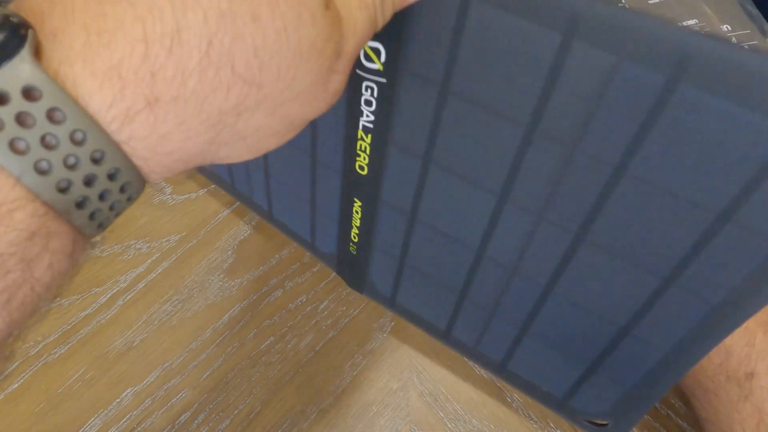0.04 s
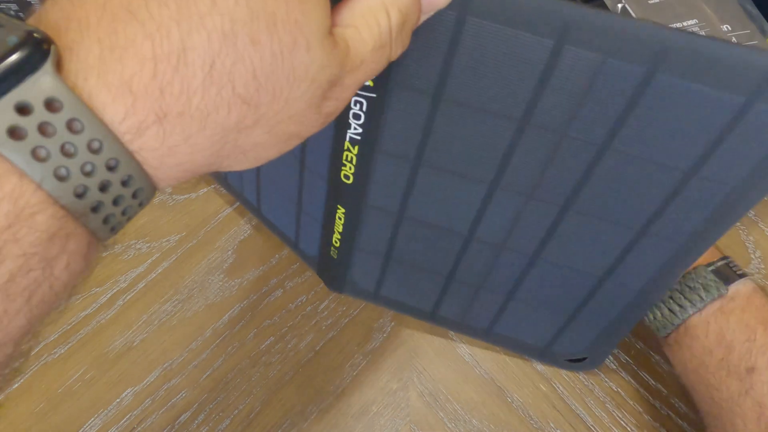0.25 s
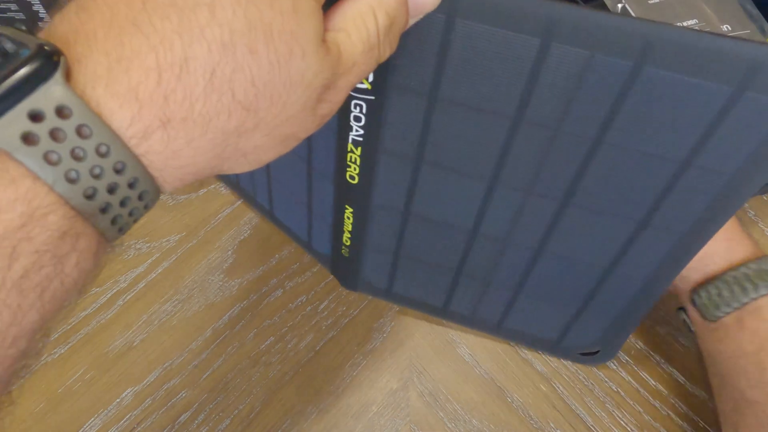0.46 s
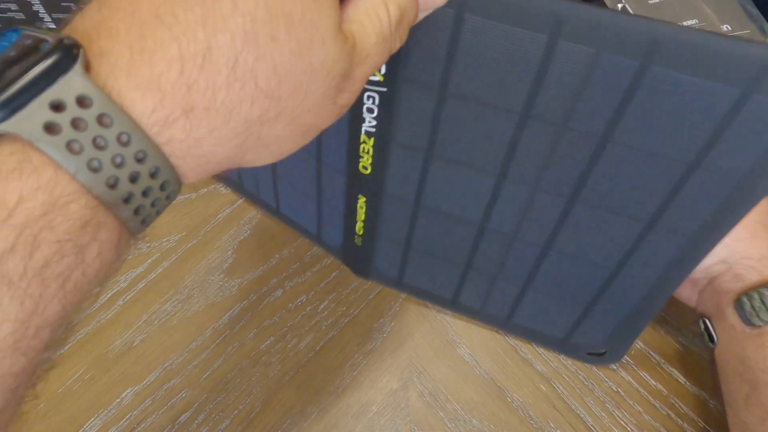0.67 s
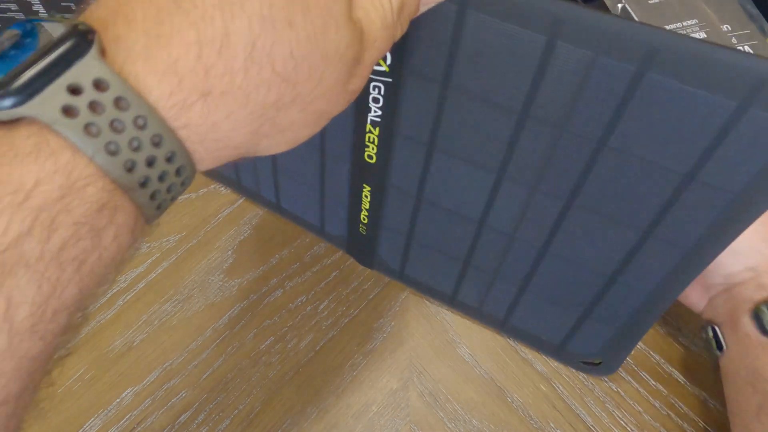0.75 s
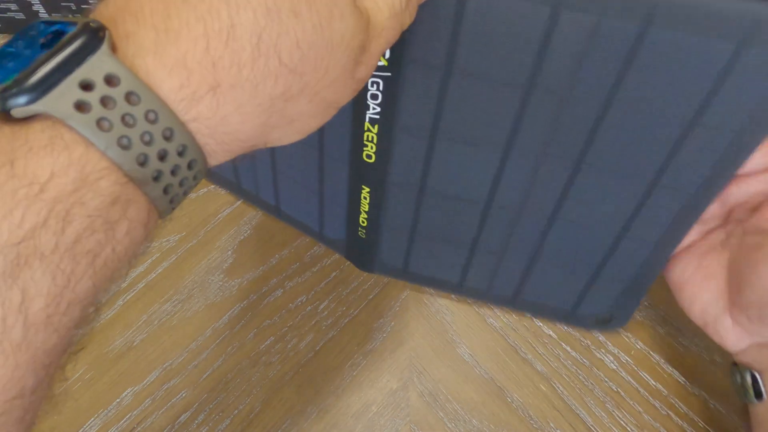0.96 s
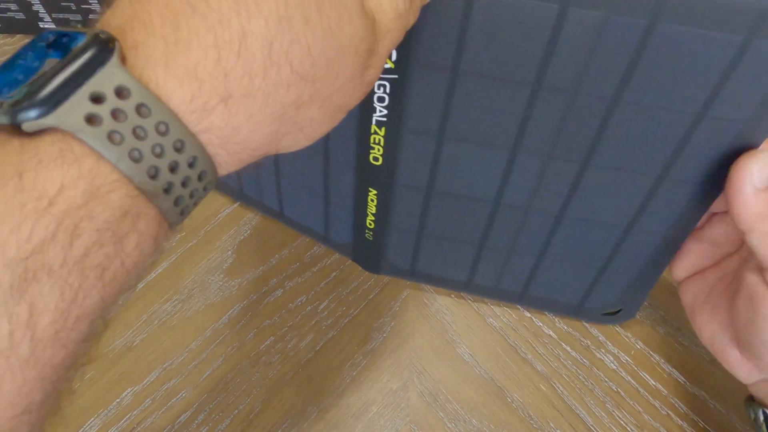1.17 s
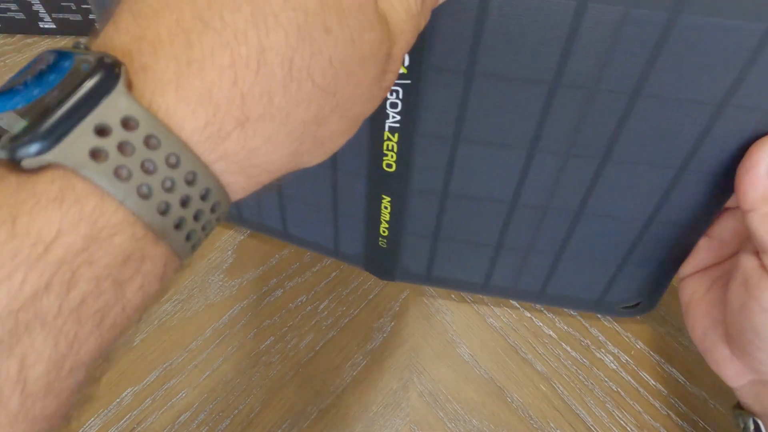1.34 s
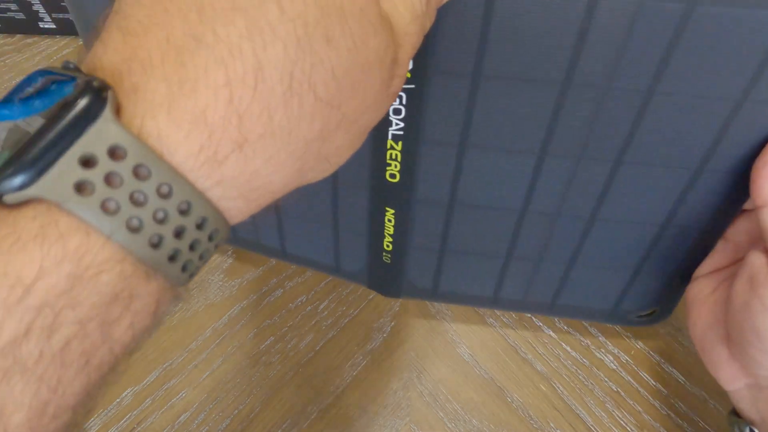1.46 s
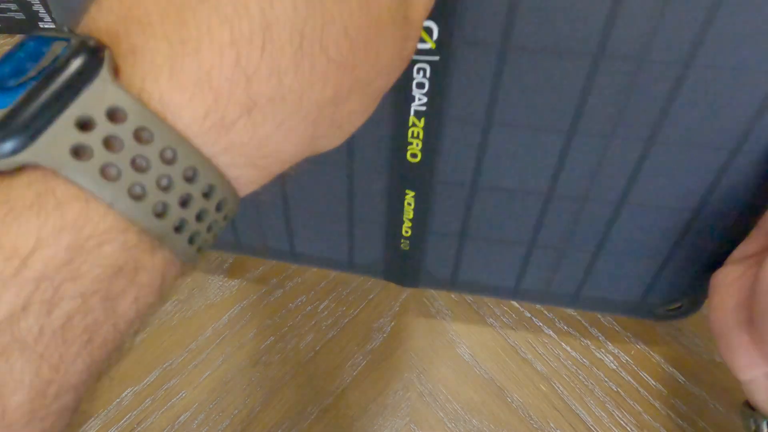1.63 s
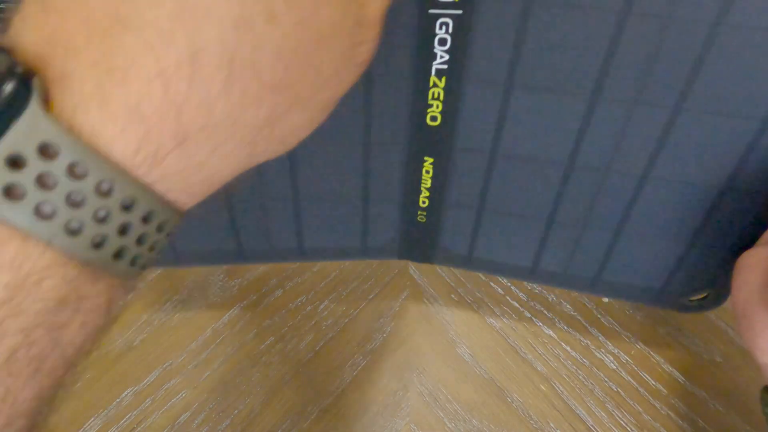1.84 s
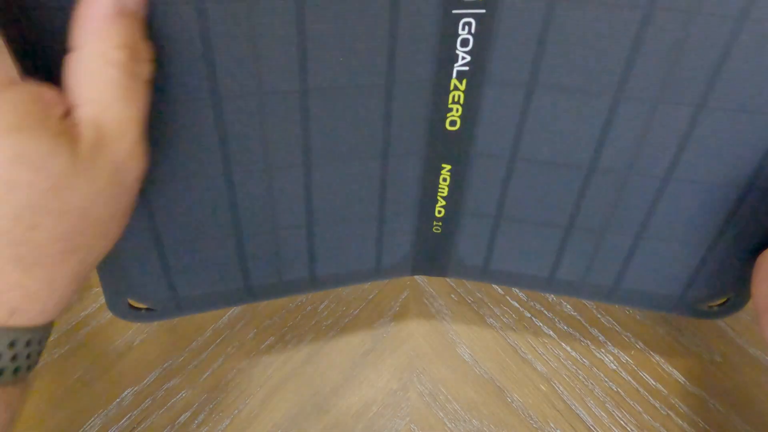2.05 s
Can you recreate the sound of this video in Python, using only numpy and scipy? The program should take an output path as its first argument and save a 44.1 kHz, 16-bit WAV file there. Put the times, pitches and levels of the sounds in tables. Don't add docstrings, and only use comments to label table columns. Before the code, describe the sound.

Wire kickstand clicking and creaking as it swings, with dull panel bumps on a wooden tabletop

```python
import sys
import numpy as np
from scipy import signal
from scipy.io import wavfile

SR = 44100
rng = np.random.default_rng(int(sys.argv[2]) if len(sys.argv) > 2 else 0)


def unload_audio(sound):
    columns = np.transpose(np.atleast_2d(sound))
    steps = np.round(np.clip(columns, -1, 1) * 32767)
    wavfile.write(sys.argv[1], SR, steps.astype(np.int16))


def gain_from_decibels(decibels):
    exponent = np.asarray(decibels, float) / 20
    return 10 ** exponent


N = 92610

# start_s, level_db
HUM_LEVEL = [(0, -60), (.2, -51), (1.7, -58.5), (1.85, -78.5), (1.98, -52.5), (2.1, -50.5)]
# frequency_hz, density_db (per Hz)
AIR_SPECTRUM = [(20, 10.5), (60, -14), (130, -3), (250, -14), (600, -54.5), (2500, -56.5), (6000, -41.5),
                (14000, -74)]
# frequency_hz, share
LIKENESS = [(60, 0.75), (300, 0.49), (1000, 0.8), (4000, 0.69), (12000, 0.64)]
# start_s, level_db, brightness_db_per_octave
RUB = [(0, -81, 2.5), (.6, -71, -8), (.75, -60, 11), (.8, -44.5, 0), (.87, -57.5, -3), (.96, -58.5, -4),
       (1.03, -45, -1.5), (1.08, -43, -4.5), (1.11, -60.5, -1), (1.3, -54.5, 0.5), (1.55, -56, -1.5),
       (1.67, -65, 2.5), (1.72, -57, 2.5), (1.77, -79, 10.5), (1.87, -70.5, 0.5), (1.93, -74.5, 10.5),
       (1.99, -46, 7), (2.1, -53, 6)]
# frequency_hz, density_db (per Hz)
CLOTH_SPECTRUM = [(250, 10.5), (500, 2), (1000, 9), (2000, 1), (3000, -9.5), (4700, -9), (8000, -24.5),
                  (14000, -43)]
# start_s, level_db
DRAG = [(0, -80), (.19, -68), (.22, -36), (.5, -41), (.56, -37.5), (.67, -56), (.8, -30), (.94, -43.5),
        (1.0, -27.5), (1.09, -43), (1.12, -49.5), (1.3, -37.5), (1.55, -47.5), (1.6, -56.5), (1.8, -63),
        (2.1, -68.5)]
# start_s, peak_db, contact_softness_ms, flex_pitch_hz
BUMPS = [(0.207, -32.5, 0.21, 170), (0.294, -25.5, 1.8, 169), (0.348, -35, 0.63, 108),
         (0.458, -34.5, 0.63, 154), (0.58, -21.5, 0.44, 83.6), (0.614, -16.5, 1.12, 125.6),
         (0.784, -25, 0.92, 139.4), (0.809, -14.5, 2.67, 75), (0.843, -22, 2.1, 98),
         (0.966, -18.5, 1.66, 147), (.977, -20.5, 0.73, 128), (1.034, -30, 0.24, 104),
         (1.062, -28, 0.064, 117), (1.088, -29, 0.21, 70.5), (1.136, -23, 1.2, 74.6),
         (1.208, -17, 0.24, 130), (1.237, -27, 0.84, 110), (1.268, -16.5, 1.28, 163),
         (1.301, -64, 0.71, 115), (1.467, -43, 0.15, 179), (1.718, -54, 0.35, 144)]
# pitch_hz, level_db, t60_s
TABLE_MODES = [(59.3, -5.5, 0.31), (108, -10, 0.27), (133.7, 3.5, 0.053), (169.7, -5, 0.28),
               (248.6, -1.5, 0.17), (265, -2, 0.05), (337, -2.5, 0.069), (396.5, -12, 0.14),
               (503, 2, 0.015)]
# start_s, peak_db, contact_softness_ms, chatter_s, low_ring_db
SNAPS = [(0.1853, -61, 0.039, 0.012, -8), (0.197, -44, 0.051, 0.007, -7.5),
         (0.2077, -19.5, 0.033, 0.0097, -5), (0.218, -29.5, 0.083, 0.0056, 3),
         (0.299, -26.5, 0.053, 0.0027, 0), (0.424, -17.5, 0.072, 0.0015, -8.5),
         (0.429, -31, 0.28, 0.0015, 7.5), (0.7763, -25, 0.051, 0.0027, -1.5),
         (0.9066, -37, 0.12, 0.00081, -4.5), (1.211, -32, 0.21, 0.0026, -9),
         (0.782, -29.5, 0.089, 0.0042, -5)]
# pitch_hz, width_hz, level_db
FRAME_MODES = [(1099, 74, -4.5), (1424, 110, -10), (1600, 41, -6.5), (1666, 39, -12.5), (2088, 82, -6.5),
               (2547, 58, -14.5), (2663, 40, -13.5), (2854, 110, -12), (3420, 370, -2.5), (3790, 43, -16.5),
               (4660, 27, -17.5), (4700, 180, -29), (5070, 390, -0.5), (7330, 1200, 4.5)]
# pitch_hz, width_hz, level_db
FOLDED_FRAME_MODES = [(1040, 78, -6), (1357, 41, -9.5), (1505, 130, -7), (2000, 37, -13), (2450, 120, -7),
                      (2750, 210, -4), (3530, 90, -7.5), (4231, 150, -7.5), (6040, 270, -1.5),
                      (6560, 490, -1.5)]
# start_s, level_db, brightness_db_per_octave
SCRAPE = [(.2, -109, -16), (.24, -43, 10), (.33, -42, -0.5), (.4, -50, -1), (.5, -50, 3), (.57, -49, 2),
          (.62, -72, 6.5), (.68, -62.5, 6), (.765, -40.5, 2.5), (.84, -48.5, -2.5), (1.1, -54, -5.5),
          (1.25, -52, 2.5), (1.28, -67.5, 12), (1.345, -40.5, 0.5), (1.39, -40, 1), (1.545, -43.5, -0.5),
          (1.575, -54, -2.5), (1.76, -73.5, -2.5)]
# pitch_hz, width_hz, level_db
WIRE_MODES = [(582, 52, -3.5), (929, 19, -19.5), (1074, 59.5, -7), (1508, 152, 2), (1646, 246, 3),
              (2183, 180, -6.5), (2400, 41, -13.5), (2650, 230, -12), (2802, 53, -15.5), (3093, 162, -12.5),
              (3744, 250, -10), (4685, 104, -18.5), (4945, 370, -15), (6540, 180, -30)]
# start_s, length_s, from_hz, to_hz, level_db
SQUEAKS = [(.212, 0.021, 1600, 1634, -35.5), (.325, 0.019, 1035, 1040, -43),
           (.345, 0.042, 1040, 1005, -44.5), (.355, 0.048, 1600, 1600, -56.5),
           (.52, 0.063, 1076, 1113, -52), (.67, 0.13, 1629, 1600, -58.5), (.738, 0.039, 1627, 1615, -47),
           (.73, 0.02, 1060, 1127, -60), (1.1, .05, 1600, 1600, -53), (.21, .022, 1104, 1134, -37),
           (1.25, 0.058, 1570, 1594, -51), (1.26, 0.077, 1076, 1068, -53.5),
           (1.305, 0.077, 1579, 1578, -46.5), (1.36, 0.042, 1080, 1123, -47.5),
           (1.465, 0.062, 1638, 1632, -49), (1.505, 0.055, 1680, 1656, -45.5),
           (1.56, 0.069, 1656, 1657, -60)]
# start_s, peak_db, brightness_db_per_octave, length_s, lower_ring_lean_db
CATCHES = [(0.902, -39.5, -1.5, 0.0023, -5), (1.262, -44.5, -3, 0.017, 9), (1.317, -33, -10, 0.015, -4.5),
           (1.3612, -34, 2.5, 0.0047, 8), (1.373, -33, 6, 0.0098, 12), (1.396, -25.5, -9, 0.0062, -2),
           (1.402, -34, 4.5, 0.005, 9), (1.4455, -37, 1, 0.0055, 13.5), (1.468, -36, -7, 0.0081, 3),
           (1.49, -33.5, 5.5, 0.0057, 5), (1.514, -34, 2, 0.0053, -6), (1.5247, -34.5, -2, 0.0091, -0.5),
           (1.552, -46, -10, 0.002, -18), (1.672, -46, -13, 0.0021, 0.5)]
# start_s, length_s, from_hz, to_hz, level_db
FOLD = [
    (1.945, 0.0586, 850, 1190, -55),
    (1.99, 0.0334, 1900, 1890, -48),
    (2.02, .08, 1680, 2250, -58),
    (2.06, 0.0746, 844, 1680, -51),
]

HUM_HZ, HUM_HALF_DB, HUM_LEFT_DB = 117.8, -6.5, 1
AIR_DB = -57.5
DRAG_DB, JOLTS_PER_S, DRAG_CUT_HZ = -5.5, 400, 680
BUMP_DB, FLEX_DB, FLEX_CYCLES = -4, 5.5, 6.54
FIRST_TOUCH, CHATTER_PER_S = 2.19, 6000
CRACK_DB, SNAP_RING_DB, RING_PUSH_S = -7.5, -17, 0.002
SNAP_TAIL_DB, SNAP_TAIL_T60_S = -13.5, 0.3
FOLDED_S = (0.4, 0.5)
SLIPS_PER_S, SLIP_SPREAD_DB, SCRAPE_WAVER_DB = 2200, 3.0, 2.0
SCRAPE_RING_DB, SCRAPE_GRIT_DB, GRIT_CUT_HZ = -23.5, -19, 5000
LEANING_S, FREE_PANEL_DB = (1.26, 1.62), -5
CATCHES_DB, CATCH_NARROWING, CATCH_PANEL_DB = -8, 0.6, -8
SQUEAK_WIDTH_HZ, FOLD_WIDTH_HZ = 35, 55
ROOM_T60_S, ROOM_DB, WALL_CUT_HZ, ROOM_LOW_HZ = 0.13, -10.5, 8400, 417
LEFT_DB, TOP_HZ = -0.15, 15300


def rms_one(x):
    return x / np.sqrt(np.mean(x ** 2) + 1e-20)


def in_time(rows):
    s, *columns = np.transpose(rows)
    return [np.interp(np.arange(N) / SR, s, c) for c in columns]


def at_hz(points, hz):
    table_hz, level = np.array(points).T
    return np.interp(np.log(hz), np.log(table_hz), level)


def drift(rate):
    r = np.exp(-80 * np.pi * rate / SR)
    white = rng.standard_normal(N // 40 + 2002)
    slow = signal.lfilter([1], [1, -2 * r, r * r], white)[2000:]
    return np.interp(np.arange(N) / 40, np.arange(len(slow)), rms_one(slow))


def ring(x, hz, width):
    r, w = np.exp(-np.pi * width / SR), 2 * np.pi * hz / SR
    return signal.lfilter([0, np.sin(w)], [1, -2 * r * np.cos(w), r * r], x + 1e-18)


def cut(x, hz, kind="low"):
    hz = np.clip(hz, 10, 0.45 * SR)
    return signal.sosfilt(signal.butter(2, hz, kind, fs=SR, output="sos"), x)


def grains(rate, spread_db):
    sizes = gain_from_decibels(spread_db * np.minimum(rng.exponential(1, N), 5))
    signs = rng.choice([-1, 1], N)
    return rms_one(sizes * signs * (rng.random(N) < rate / SR))


def left_right(db):
    return gain_from_decibels(np.array([[db], [-db]]))


def banded_noise(spectrum, patchy_db, tilt_db=0, grit=0):
    out, power = 0, 0
    together = drift(9)
    edges = 20 * 2 ** np.arange(0, 9.6, 0.5)
    clicks = grains(730, 3.1) * [[1], [0]]
    white = (rng.standard_normal((2, 2, N)) + grit * clicks) / np.hypot(1, grit)
    for k, (low, high) in enumerate(zip(edges, edges[1:])):
        band = signal.butter(2, [low, high], "band", fs=SR, output="sos")
        mid, side = signal.sosfilt(band, white[k % 2])
        hz = np.sqrt(low * high)
        level_db = at_hz(spectrum, hz)
        alike = np.clip(at_hz(LIKENESS, hz), 0, 1)
        power += gain_from_decibels(2 * level_db) * (high - low) * 4 / SR
        flicker_db = patchy_db * (together + drift(25))
        gain = gain_from_decibels(level_db + tilt_db * np.log2(hz / 2000) + flicker_db)
        out = out + gain * (np.sqrt(1 + alike) * mid + np.sqrt(1 - alike) * side * [[1], [-1]])
    return out / np.sqrt(power)


def glides(rows, width_hz):
    wobble = cut(cut(rng.standard_normal((2, N)), width_hz), width_hz)
    flicker, out = gain_from_decibels(2.0 * drift(44)), 0
    for k, (s, length, from_hz, to_hz, db) in enumerate(rows):
        way = np.clip((np.arange(N) / SR - s) / length, 0, 1)
        phase = 2 * np.pi * np.cumsum(from_hz + (to_hz - from_hz) * way) / SR
        a, b = np.roll(wobble, k * N // 19, axis=1)
        tone = rms_one((a + np.std(a)) * np.cos(phase) + b * np.sin(phase))
        out = out + gain_from_decibels(db) * np.sin(np.pi * way) * tone
    return flicker * out


def hum():
    phase = 2 * np.pi * HUM_HZ * np.arange(N) / SR
    tone = np.sin(phase) + gain_from_decibels(HUM_HALF_DB) * np.sin(phase / 2)
    return gain_from_decibels(in_time(HUM_LEVEL)[0]) * np.sqrt(2) * tone


def room_air():
    return gain_from_decibels(AIR_DB) * banded_noise(AIR_SPECTRUM, patchy_db=1.2)


def cloth_rub():
    level_db, tilt_db = in_time(RUB)
    rub = banded_noise(CLOTH_SPECTRUM, patchy_db=2.7, tilt_db=tilt_db, grit=0.25)
    return cut(gain_from_decibels(level_db) * rub, 170, "high")


def drag():
    return gain_from_decibels(in_time(DRAG)[0] + DRAG_DB) * cut(grains(JOLTS_PER_S, 2.53), DRAG_CUT_HZ)


def bumps():
    strengths = rng.normal(0, 1.0, (len(BUMPS), len(TABLE_MODES)))
    pushes, flex = np.zeros((len(TABLE_MODES), N + SR)), np.zeros(N + SR)
    t = np.arange(SR // 4) / SR
    for (s, peak_db, soft, hz), own_db in zip(BUMPS, strengths):
        i = int(s * SR)
        contact = t * np.exp(-1000 * t / soft)
        contact *= gain_from_decibels(peak_db) / contact.sum()
        pushes[:, i:i + len(t)] += gain_from_decibels(BUMP_DB + own_db)[:, None] * contact
        flex[i:i + len(t)] += gain_from_decibels(FLEX_DB) * ring(contact, hz, np.log(1000) / np.pi * hz / FLEX_CYCLES)
    return pushes[:, :N], flex[:N]


def table():
    friction = drag()
    pushes, out = bumps()
    for push, (hz, db, t60) in zip(pushes, TABLE_MODES):
        out = gain_from_decibels(db) * ring(push + 0.05 * friction, hz, np.log(1000) / np.pi / t60) - out
    return cut(cut(out, 72, "high"), 46, "high")


def frame_ring(push, frame, low_db):
    span, out = len(push), 0
    short_push = push * np.exp(-np.arange(span) / SR / RING_PUSH_S)
    for k, (hz, width, db) in enumerate(frame):
        share = np.sqrt(np.sum(push ** 2) * SR / (4 * np.pi * width) / span)
        gain = gain_from_decibels(db + low_db * (hz < 1800)) * share
        out = out + gain * rms_one(ring(short_push, hz, width)) * (-1) ** k
    return out


def snaps():
    out, span = np.zeros(N + SR), SR // 2
    t = np.arange(span) / SR
    for s, db, soft, length, low_db in SNAPS:
        touches = rng.standard_normal(span) * (rng.random(span) < CHATTER_PER_S / SR)
        chatter = touches * (1 - np.exp(-t / 0.0002)) * np.exp(-t / length)
        push = chatter + FIRST_TOUCH * (np.arange(span) == 20)
        frame = FOLDED_FRAME_MODES if FOLDED_S[0] < s < FOLDED_S[1] else FRAME_MODES
        rung = frame_ring(push, frame, low_db)
        crack = cut(push * np.exp(-t / 0.0019), 4200, "high")
        tail = cut(rng.standard_normal(span), 600, "high")
        tail = tail * gain_from_decibels(-60 * t / SNAP_TAIL_T60_S) * (1 - np.exp(-t / 0.00065))
        bright_hz = 160 / soft
        struck = (gain_from_decibels(CRACK_DB) * crack + gain_from_decibels(SNAP_RING_DB) * rung) * 8000 / bright_hz
        i = int(s * SR)
        out[i:i + span] += gain_from_decibels(db) * cut(cut(struck + gain_from_decibels(SNAP_TAIL_DB) * tail, bright_hz), 2 * bright_hz)
    return cut(out[:N], 540, "high")


def scrape():
    level_db, tilt_db = in_time(SCRAPE)
    force = gain_from_decibels(level_db + SCRAPE_WAVER_DB * drift(32))
    slips = force * grains(SLIPS_PER_S, SLIP_SPREAD_DB)
    free = np.abs(np.arange(N) / SR - np.mean(LEANING_S)) > np.ptp(LEANING_S) / 2
    rung = 0
    for k, (hz, width, db) in enumerate(WIRE_MODES):
        gain = gain_from_decibels(db + 0.5 * drift(1.3) + FREE_PANEL_DB * free * (k == 0))
        tilted = slips * gain_from_decibels(tilt_db * np.log2(hz / 1500))
        rung = rung + gain * ring(tilted, hz, width) * (-1) ** k
    grit = cut(cut(slips * gain_from_decibels(tilt_db), GRIT_CUT_HZ), GRIT_CUT_HZ)
    return gain_from_decibels(SCRAPE_RING_DB) * rung + gain_from_decibels(SCRAPE_GRIT_DB) * cut(grit, 980, "high")


def squeaks():
    return glides(SQUEAKS, SQUEAK_WIDTH_HZ)


def catches():
    out, span = np.zeros(N + SR), SR // 8
    t = np.arange(span) / SR
    for s, peak_db, tilt_db, length, lean_db in CATCHES:
        slips = rng.standard_normal(span) * np.exp(-t / length) * (1 - np.exp(-t / 0.0019))
        push = 0.14 * slips + 0.65 * (np.arange(span) == 0)
        rung = 0
        for k, (hz, width, db) in enumerate(WIRE_MODES):
            mode_db = db + tilt_db * np.log2(max(hz, 1000) / 1500)
            mode_db += lean_db * (800 < hz < 1300) + CATCH_PANEL_DB * (k == 0)
            rung = rung + gain_from_decibels(mode_db) * ring(push, hz, width * CATCH_NARROWING) * (-1) ** k
        i = int(s * SR)
        out[i:i + span] += gain_from_decibels(peak_db) * rung
    return gain_from_decibels(CATCHES_DB) * out[:N]


def fold():
    return glides(FOLD, FOLD_WIDTH_HZ)


def room(x):
    out, dull = np.zeros((2, N)), np.exp(-2 * np.pi * WALL_CUT_HZ / SR)
    x = cut(x, ROOM_LOW_HZ, "high")
    lags = (rng.uniform(0.003, 0.028, 16) * SR).astype(int)
    for k, lag in enumerate(lags):
        loop, state = x.copy(), [0.]
        gain = gain_from_decibels(-60 * lag / SR / ROOM_T60_S)
        for i in range(lag, N, lag):
            back, state = signal.lfilter([gain * (1 - dull)], [1, -dull], loop[i - lag:i], zi=state)
            loop[i:i + lag] += back[:N - i]
        out[k % 2] += (loop - x) * (-1) ** (k // 2)
    return out


def scene():
    around = hum() * left_right(HUM_LEFT_DB) + room_air() + cloth_rub()
    near = table() + snaps() + scrape() + squeaks() + catches() + fold()
    return near * left_right(LEFT_DB) + gain_from_decibels(ROOM_DB) * room(near) + around


def top_cut(x):
    return signal.sosfilt(signal.butter(12, 14260, fs=SR, output="sos"), x)


def record(dry):
    low_pass = signal.cheby2(10, 60, TOP_HZ, fs=SR, output="sos")
    mix = signal.sosfilt(low_pass, dry)
    return top_cut(mix)


dry = scene()
out = record(dry)
unload_audio(out)
```